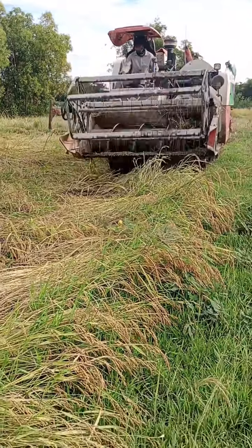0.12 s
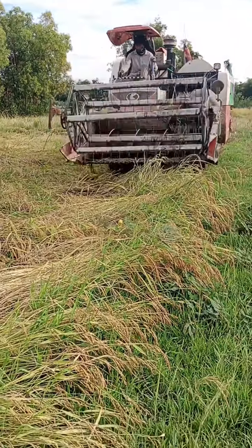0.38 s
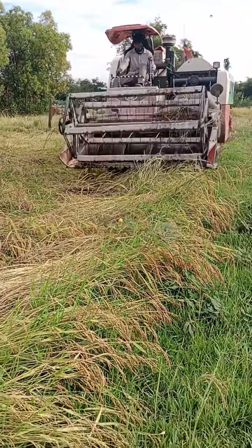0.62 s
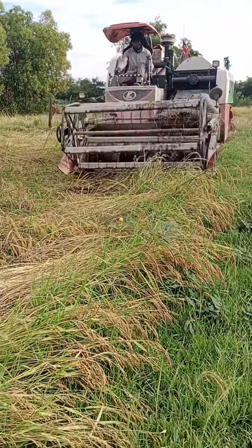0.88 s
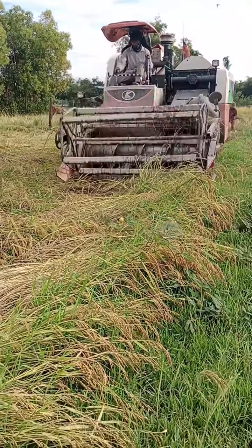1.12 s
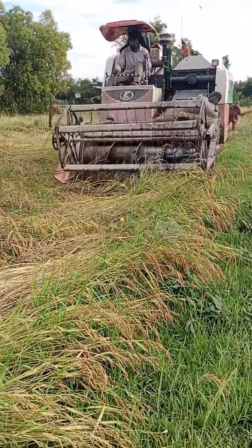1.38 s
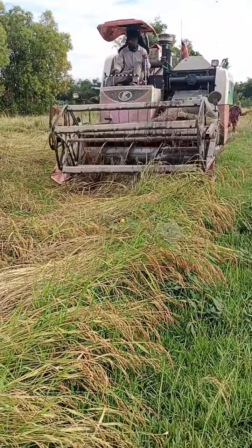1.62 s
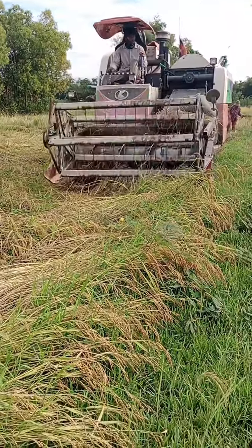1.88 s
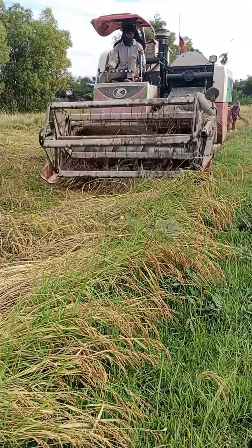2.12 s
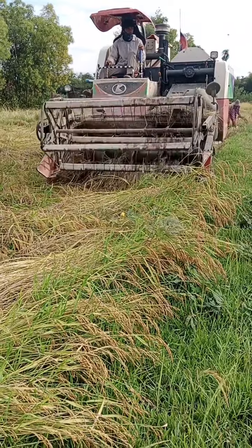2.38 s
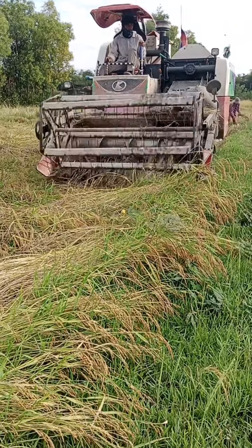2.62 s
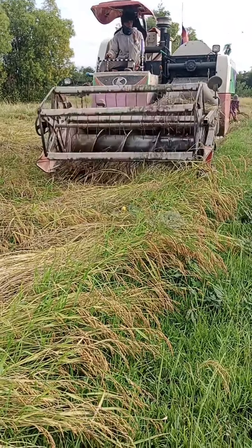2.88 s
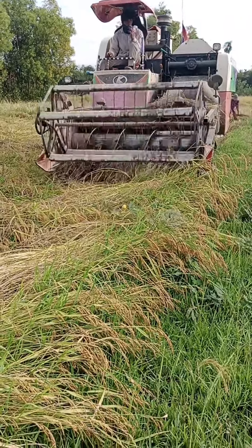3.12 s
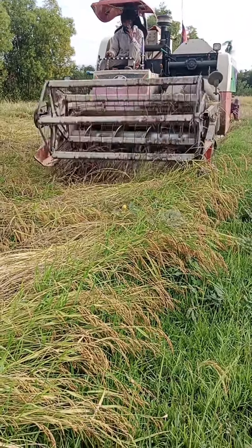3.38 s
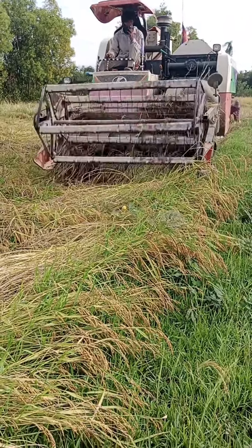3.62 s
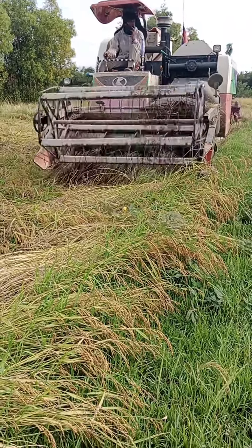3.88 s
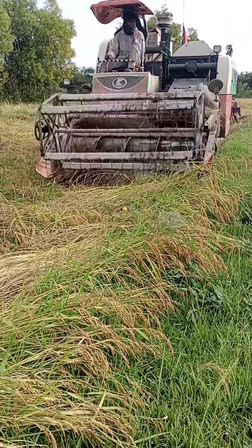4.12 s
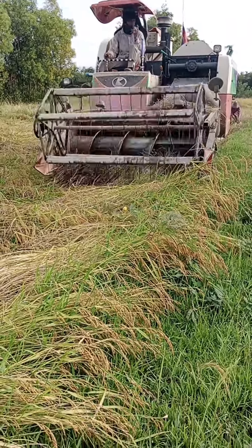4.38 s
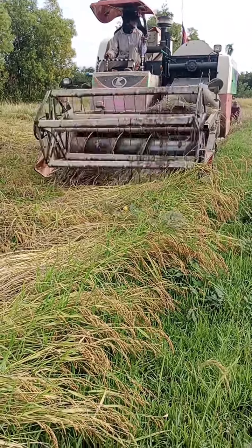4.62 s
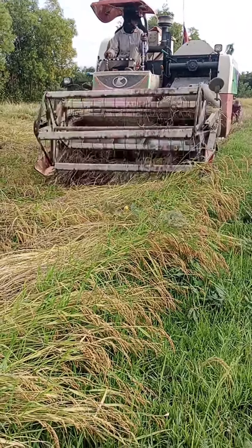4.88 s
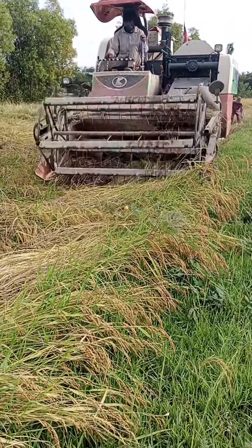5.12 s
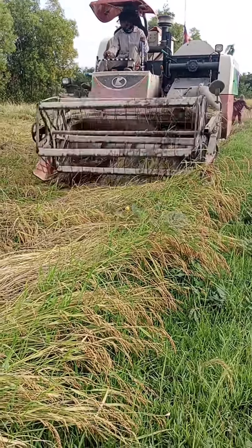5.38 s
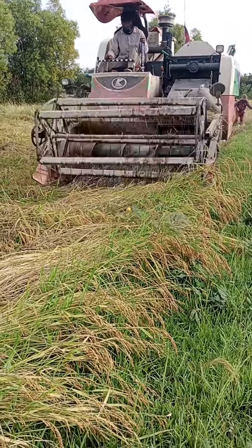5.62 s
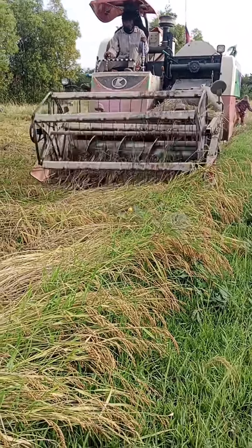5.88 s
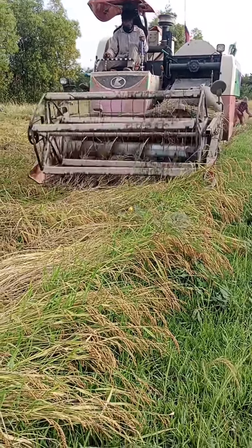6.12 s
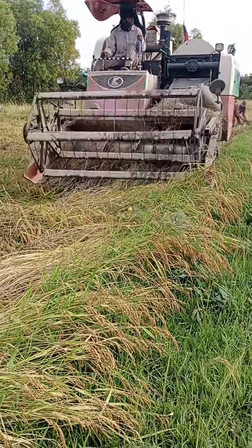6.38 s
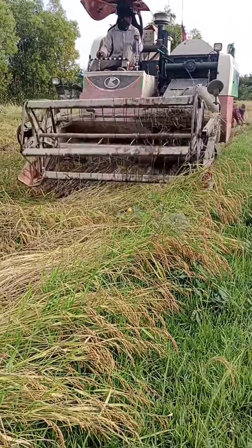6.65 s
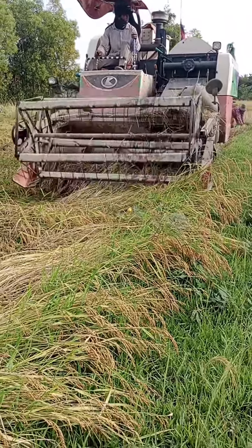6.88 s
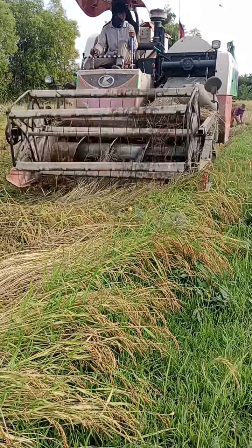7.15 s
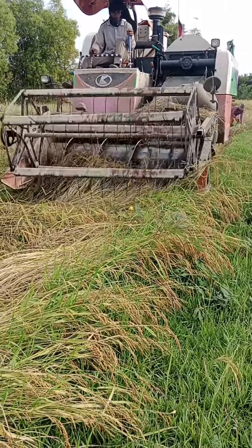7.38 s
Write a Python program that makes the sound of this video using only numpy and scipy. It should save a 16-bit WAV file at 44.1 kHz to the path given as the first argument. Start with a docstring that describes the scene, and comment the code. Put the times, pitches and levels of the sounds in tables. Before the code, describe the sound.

Close, even din of a harvesting machine: humming diesel, rumbling drum, roaring chains, and a cutter bar rattling about fifteen times a second.

```python
"""Combine harvester in a rice field

A diesel hums at its firing rate beside a slightly faster fan, as wavering sine tones with overtones.
Shaped noise makes the drum's rumble, the roar of chains and reel and the hiss of straw.
Ringing sheet metal thumps, and the cutter bar clacks about fifteen times a second: noise bursts and rings.
Two narrow bands of treble stay dead, and other treble flickers between alike and unlike in two channels."""
import sys
import numpy as np
from scipy import signal
from scipy.io import wavfile
from scipy.ndimage import uniform_filter1d

SR = 44100
rng = np.random.default_rng(int(sys.argv[2]) if len(sys.argv) > 2 else 0)


def volts(x):
    """Linear amplitude factor 10**(x/20) for a level x in dB, scalar or array-like."""
    e = np.asarray(x, float) / 20
    return 10 ** e


def store_wav(level_fs):
    """Save 16-bit WAV to argv[1]."""
    pcm = np.round(np.clip(np.atleast_2d(level_fs), -1, 1) * 32767)
    wavfile.write(sys.argv[1], SR, pcm.T.astype(np.int16))


N = 331191  # length in samples
FIRING_HZ = 95.25


def evened(x):
    """Scales to rms 1."""
    return x / np.sqrt(np.mean(x ** 2) + 1e-20)


def read(points, hz):
    """Reads a spectrum along a log pitch axis; 90 dB down outside the table."""
    f, value = np.transpose(points)
    return np.interp(np.log(hz + 1), np.log(f + 1), value, left=-90, right=-90)


def curve(table, column):
    """Draws straight lines between the rows: one column of a table at every sample."""
    rows = np.array(table)
    return np.interp(np.arange(N) / SR, rows[:, 0], rows[:, column])


def wander(hz):
    """Slow random drift of rms 1: noise with everything much faster than hz removed."""
    lowpass = signal.butter(2, hz, fs=SR, output="sos")
    return evened(signal.sosfilt(lowpass, rng.standard_normal(N)))


def noise(spectrum, size, patchy_db=0., flicker_db=0.):
    """Noise of rms 1 from random short-time spectra, with patches and a flicker shared by all pitches."""
    hop = size // 4
    a, b, patches = rng.standard_normal((N // hop + 5, size // 2 + 1, 3)).T
    patches = uniform_filter1d(patches, size=8, axis=0)  # across pitch
    patches = evened(uniform_filter1d(patches, size=6, axis=1))  # across time
    flicker = evened(uniform_filter1d(rng.standard_normal(a.shape[1]), size=3))
    level_db = read(spectrum, np.fft.rfftfreq(size, 1 / SR))[:, None]
    level_db = level_db + patchy_db * patches + flicker_db * flicker
    sound = signal.istft((a + 1j * b) * volts(level_db), nperseg=size, noverlap=size - hop)[1]
    return evened(sound[:N])


def tone(turns, waver_db):
    """A sine, of rms 1 before its strength wavers."""
    return np.sqrt(2) * np.sin(2 * np.pi * turns) * volts(waver_db * wander(2.36))


def ring(blows, modes, reach_hz):
    """Each blow (time [s], strength [dB], centre [Hz]) sounds the dying modes near its centre most."""
    s, blow_db, centre_hz = np.transpose(blows)
    at = np.minimum((s * SR).astype(int), N - 1)
    t = np.arange(SR // 5) / SR
    out = np.zeros(N)
    chance = rng.standard_normal((len(s), len(modes)))
    for (hz, db, t60), luck in zip(modes, chance.T):
        nearness = np.exp(-((hz - centre_hz) / reach_hz) ** 2)
        hits = np.zeros(N)
        np.add.at(hits, at, np.sign(luck) * volts(blow_db + db + 1.06 * luck) * nearness)
        fade_in = np.minimum(t / 0.0013, 1)
        mode = np.sin(2 * np.pi * hz * t) * volts(-60 * t / t60) * fade_in
        out += signal.oaconvolve(hits, mode)[:N]
    return out


# How far the fan runs ahead of the firing, and how loud both hum before wavering:
# (time [s], lead [turns], firing tone level [dB], fan tone level [dB])
DIESEL_HUM = [(0, 0.54, -35.5, -32.5), (1.0, 1.51, -33, -30), (1.83, 2.33, -27.5, -34.5),
              (2.75, 3.64, -29, -35), (3.62, 4.53, -28.5, -36), (4.65, 5.9, -29, -37),
              (5.67, 6.5, -28.5, -28.5), (6.65, 8.06, -30, -39), (7.68, 8.8, -25, -44)]
# Overtones: (multiple, level relative to firing tone [dB], level relative to fan tone [dB])
HUM_OVERTONES = [(2, -4, 0.5), (3, -2, -4.5), (5, -11, -8), (6, -16.5, -7)]
# Shafts and gears: (pitch [Hz], level before wavering [dB])
SHAFT_WHINES = [(75.5, -51), (418, -58), (1478, -49.5)]


def diesel():
    """Firing tone and a slightly faster fan beat together, with overtones; shafts and gears whine."""
    t = np.arange(N) / SR
    firing = FIRING_HZ * t + 0.025 * wander(1.74)
    fan = firing + curve(DIESEL_HUM, column=1)
    firing_db, fan_db = curve(DIESEL_HUM, column=2), curve(DIESEL_HUM, column=3)
    out = volts(firing_db) * tone(firing, waver_db=0.0) + volts(fan_db) * tone(fan, waver_db=4.0)
    for k, over_firing_db, over_fan_db in HUM_OVERTONES:
        out += volts(firing_db + over_firing_db) * tone(k * firing + rng.random(), waver_db=1.0)
        out += volts(fan_db + over_fan_db) * tone(k * fan + rng.random(), waver_db=2.5)
    for hz, db in SHAFT_WHINES:
        out += volts(db) * tone(hz * t + 0.34 * wander(3.3), waver_db=8.5)
    return out


# Colour of the drum's rumble: (pitch [Hz], relative level per Hz [dB])
DRUM_RUMBLE = [(12, -62), (20, -33), (32, -31), (45, -30), (60, -25.5), (75, -16), (95, -9), (110, -6),
               (150, -3), (195, 2), (250, -2), (300, -5), (345, -9.5), (400, -19), (450, -31)]


def drum(more_db):
    """The threshing drum's low noise swells slowly and rises a little with the feed."""
    t = np.arange(N) / SR
    swell_db, period_s, crest_s = 0.9, 2.086, 1.51
    swell = swell_db * np.cos(2 * np.pi * (t - crest_s) / period_s)
    level_db = -18 + 0.23 * more_db + swell  # 0.23 dB per dB of feed
    return volts(level_db) * noise(DRUM_RUMBLE, size=4096, patchy_db=-0.5)


# Colour of the chains and reel, humped by the ground echo: (pitch [Hz], relative level per Hz [dB])
CHAIN_ROAR = [(240, -30), (400, -7.5), (442, -19.5), (479, -3), (681, 1.5), (824, -0.5), (967, -10.5),
              (1260, -3), (1460, -7.5), (1660, -18), (2200, -11), (2510, -18), (2720, -16), (3490, -23),
              (4400, -30.5), (5720, -87), (9680, -120)]


def chains(feed_db):
    """Chains and reel roar as loud as the feed, shaken a little at the firing rate."""
    firing = np.cos(2 * np.pi * FIRING_HZ * np.arange(N) / SR)
    level_db = -0.5 + feed_db + 0.31 * firing
    return volts(level_db) * noise(CHAIN_ROAR, size=1024, patchy_db=1.0, flicker_db=0.94)


# Colour of the straw's hiss: (pitch [Hz], relative level per Hz [dB])
STRAW_HISS = [(4600, 0), (5250, -7.5), (6100, -4), (6730, 1), (8000, -0.5), (8900, -0.5), (9300, -11),
              (10100, -8), (10800, -4.5), (11900, -10), (12900, -11), (13250, -20), (14100, -24),
              (14250, -60)]


def straw(more_db):
    """Straw hisses in patches, louder with more crop."""
    level_db = -39.5 + 1.13 * more_db  # 1.13 dB per dB of feed
    return volts(level_db) * noise(STRAW_HISS, size=512, patchy_db=2.3, flicker_db=0.4)


# How much crop the machine swallows, as the chain roar's level before its trim: (time [s], level [dB])
CROP_FEED = [(0, -20), (0.3, -19.5), (0.65, -21), (1.0, -23.5), (1.45, -20.5), (1.75, -21.5), (2.0, -20.5),
             (2.5, -22), (2.95, -22), (3.3, -20.5), (3.8, -20.5), (4.6, -22), (5.0, -21), (5.5, -20),
             (6.1, -20), (6.55, -21), (7.0, -22), (7.51, -20)]


def machinery():
    """Drum, chains and straw all follow the feed of crop."""
    feed_db = curve(CROP_FEED, column=1)
    more_db = feed_db + 21  # the usual feed is -21 dB
    return drum(more_db) + chains(feed_db) + straw(more_db)


# Loose crop and lugs thump the housing: (time [s], relative strength [dB], centre of the ring [Hz])
LOUD_THUMPS = [(0.208, 4, 563), (0.255, -1, 706), (0.341, -6, 680), (0.413, 1.5, 624), (0.434, -4, 760),
               (0.614, -2, 611), (0.749, -7, 1220), (1.763, -9, 710), (2.029, -10, 732), (2.5, -2, 563),
               (2.642, -7, 710), (3.331, -9, 750), (5.811, -6, 630), (6.15, -5, 720), (6.215, -5.5, 1210)]
# Ringing modes of the sheet metal: (pitch [Hz], relative level [dB], time to fall 60 dB [s])
HOUSING_MODES = [(563, -9.5, 0.17), (632, -10, 0.1), (693, -0.5, 0.06), (755, 1, 0.069), (840, 5, 0.12),
                 (1204, 0.5, 0.091), (1300, 1, .1)]


def housing():
    """Dull thumps make the sheet metal ring: listed loud ones, and small ones at random."""
    per_s, middle_db, spread_db = 3.9, -14, 7.5  # of the small thumps
    when, size, where = rng.random((round(per_s * N / SR), 3)).T
    low_hz, high_hz = HOUSING_MODES[0][0], HOUSING_MODES[-1][0]
    small_db = middle_db + spread_db * (2 * size - 1)
    centre_hz = low_hz + (high_hz - low_hz) * where ** 2  # low centres are likelier
    small = np.transpose([when * N / SR, small_db, centre_hz])
    return volts(-6.0) * ring(np.vstack([LOUD_THUMPS, small]), HOUSING_MODES, reach_hz=68.4)


# The knife runs a little faster in the middle: (time [s], strokes done)
KNIFE_STROKES = [(0.003, 0), (2.434, 36), (3.556, 53), (5.609, 84), (6.546, 98), (7.488, 112)]
# Clacks that stand out of the steady strokes: (time [s], knock level [dB], tick level before its boost [dB])
LOUD_CLACKS = [(0.413, -39, -56), (0.474, -32, -43), (0.543, -29.5, -56), (0.61, -29, -50),
               (0.881, -43, -46), (1.085, -41, -49), (1.147, -33, -58), (1.306, -40, -55),
               (1.351, -50, -57), (1.545, -33, -54), (1.623, -35, -58), (1.899, -41, -54),
               (2.094, -34, -53), (2.303, -45, -48), (2.435, -37, -53), (2.762, -34, -60), (2.83, -32, -60),
               (2.892, -32, -61), (3.109, -37, -42), (3.229, -29, -63), (3.361, -37, -48),
               (3.422, -30, -53), (3.486, -37, -53), (3.556, -27, -56), (3.791, -33, -48),
               (3.819, -26, -53), (3.913, -27.5, -44), (3.94, -31, -41), (4.287, -31, -45),
               (4.348, -28.5, -49), (4.419, -25.5, -61), (4.614, -27, -66), (4.745, -34, -64),
               (4.949, -33, -60), (5.015, -31, -63), (5.08, -31, -58), (5.14, -33, -48), (5.205, -34, -62),
               (5.391, -27.5, -72), (5.609, -33, -55), (5.742, -36, -51), (6.148, -28.5, -49),
               (6.207, -32, -46), (6.946, -34, -52), (7.084, -28.5, -54), (7.22, -32, -56),
               (7.284, -30, -56)]


def clacks():
    """Rows (time [s], scrape [dB], knock [dB], tick [dB], ring centre [Hz]): every stroke, then loud clacks."""
    s, done = np.transpose(KNIFE_STROKES)
    at = np.interp(np.arange(done[-1] + 1), done, s)
    late, hard, sharp = rng.standard_normal((len(at), 3)).T
    jitter_s, spread_db = 0.003, 3.5
    steady = np.transpose([abs(at + jitter_s * late), -34 + spread_db * hard, -63 + spread_db * sharp])
    s, knock_db, tick_db = np.vstack([steady, LOUD_CLACKS]).T
    # harder knocks and sharper ticks scrape louder
    scrape_db = -41 + 0.3 * (knock_db + 31) + 0.34 * (tick_db + 55)
    low_hz, high_hz = 2040, 3880  # where along its modes a clack strikes the bar
    centre_hz = low_hz + (high_hz - low_hz) * rng.random(len(s))
    return np.transpose([s, scrape_db, knock_db, tick_db, centre_hz])


def strokes(rows, column, rise_s, t60_s):
    """Loudness curve of all clacks: each a rounded rise, then a decay."""
    hits, t = np.zeros(N), np.arange(SR // 8) / SR
    np.add.at(hits, (rows[:, 0] * SR).astype(int), volts(rows[:, column]))
    shape = (1 - np.exp(-t / rise_s)) ** 2 * volts(-60 * t / t60_s)
    return signal.oaconvolve(hits, shape / shape.max())[:N]


# Colours of the three noises in a clack: (pitch [Hz], relative level per Hz [dB])
KNOCK_COLOUR = [(800, -30), (1200, 14), (1600, -10), (2200, 5), (2800, -8.5), (3600, -13), (4300, -8.5),
                (4600, -46)]
SCRAPE_COLOUR = [(2940, -48), (5000, -7.5), (5380, -5), (7080, 4), (8580, -2.5), (9440, -9), (11000, -3.5),
                 (12100, -10), (15700, -53), (22000, -120)]
TICK_COLOUR = [(12500, -40), (12800, -12), (13200, -2), (14000, -3), (14150, -3), (14280, -40)]
# Ringing modes of the cutter bar: (pitch [Hz], relative level [dB], time to fall 60 dB [s])
BAR_MODES = [(1938, 2, 0.086), (2227, 3, 0.055), (2433, -0.5, 0.046), (2735, 3.5, 0.034),
             (2980, -0.5, 0.043), (3240, -4, 0.024), (3550, -0.5, 0.041), (3780, -21, 0.029)]


def cutter():
    """At each end of its stroke the knife knocks the bar, which rings, scrapes straw and ticks."""
    rows = clacks()
    knock = strokes(rows, column=2, rise_s=0.0025, t60_s=0.075) * noise(KNOCK_COLOUR, size=512)
    bar = volts(2.0) * ring(rows[:, [0, 2, 4]], BAR_MODES, reach_hz=810.0)
    scrape = strokes(rows, column=1, rise_s=0.0016, t60_s=0.078) * noise(SCRAPE_COLOUR, size=512)
    tick = strokes(rows, column=3, rise_s=0.0041, t60_s=0.058) * noise(TICK_COLOUR, size=512)
    return knock + bar + volts(1.5) * scrape + volts(2.5) * tick


def scene():
    """All parts add up to one sound, the same in both channels."""
    return np.tile(diesel() + machinery() + cutter() + housing(), (2, 1))


# Dead bands of treble: (low edge [Hz], high edge [Hz])
DEAD_BANDS = [(4470, 5170), (12110, 12700)]


def dropouts(hz, count):
    """Mask over pitch and time: dead bands with wandering edges, and brief gaps beside them."""
    low, high = (evened(uniform_filter1d(v, size=14)) for v in rng.standard_normal((2, count)))
    spots = uniform_filter1d(rng.standard_normal((len(hz), count)), size=4, axis=0)
    spots = evened(uniform_filter1d(spots, size=14, axis=1))
    alive, f = np.ones(spots.shape), hz[:, None]
    for low_hz, high_hz in DEAD_BANDS:
        alive *= (f < low_hz + 70 * low) | (f > high_hz + 110 * high)
        away = np.where(f > high_hz, (f - high_hz) / 1100, (low_hz - f) / 500)
        alive *= spots < 0.35 + 1.5 * away ** 2  # gaps get rarer further from the band
    return np.maximum(alive, volts(-65.))


# How often the treble differs between the channels: (pitch [Hz], share of the time)
UNLIKE_SHARE = [(5100, 0.01), (5300, .12), (5700, 0.19), (6200, 0.29), (6400, 0.71), (7800, 0.89),
                (8000, 0.024), (12600, .02), (12900, 0.24), (14200, 0.22)]


def unlike_treble(hz, count):
    """Mask over pitch and time: where the treble is unlike left and right, a few frames at a time."""
    draw = uniform_filter1d(rng.standard_normal(count), size=8)
    rank = draw.argsort().argsort() / count  # spread evenly from 0 to 1
    share = np.interp(hz, *np.transpose(UNLIKE_SHARE), left=0)
    return rank[None] < share[:, None]


def roll_off(x):
    """The treble ends steeply here."""
    return signal.sosfilt(signal.butter(12, 14280, fs=SR, output="sos"), x)


def record(dry):
    """Treble drops out, then bands get random-phase sound added left and taken away right."""
    hz, t, z = signal.stft(dry[0], SR, nperseg=1024, noverlap=768)
    alive = dropouts(hz, count=len(t))
    z = z * alive
    unlike = unlike_treble(hz, count=len(t))
    smooth = np.sqrt(abs(uniform_filter1d(abs(z) ** 2, size=5, axis=0)))  # strength across near pitches
    side = 1.3 * alive * unlike * smooth * np.exp(2j * np.pi * rng.random(z.shape))
    both = signal.istft(np.array([z + side, z - side]), SR, nperseg=1024, noverlap=768)[1][:, :N]
    return roll_off(both)


dry = scene()
out = record(dry)
store_wav(out)
```